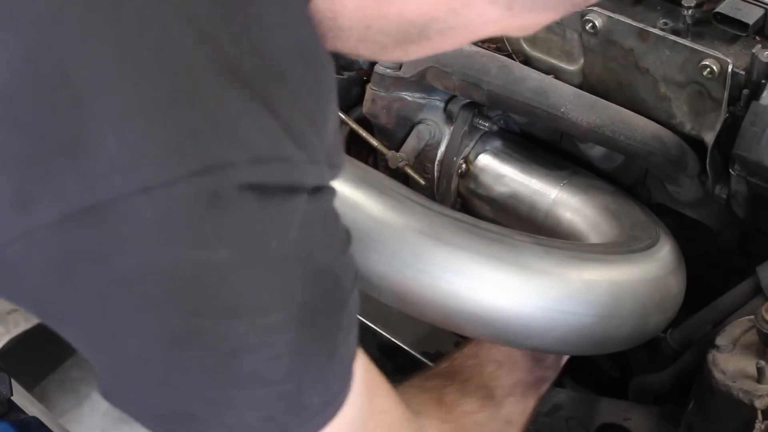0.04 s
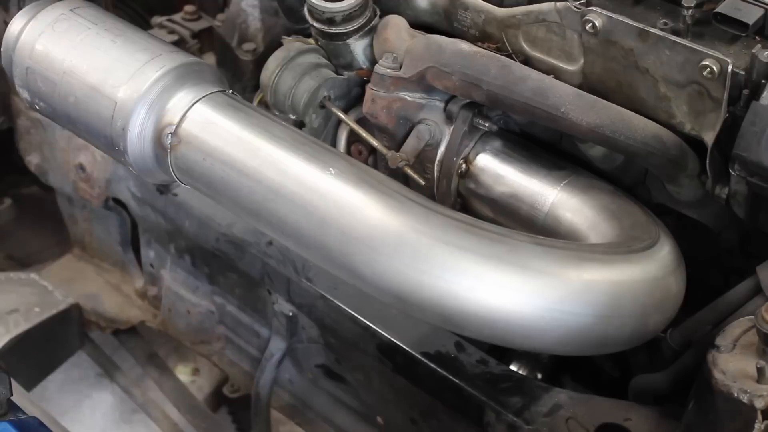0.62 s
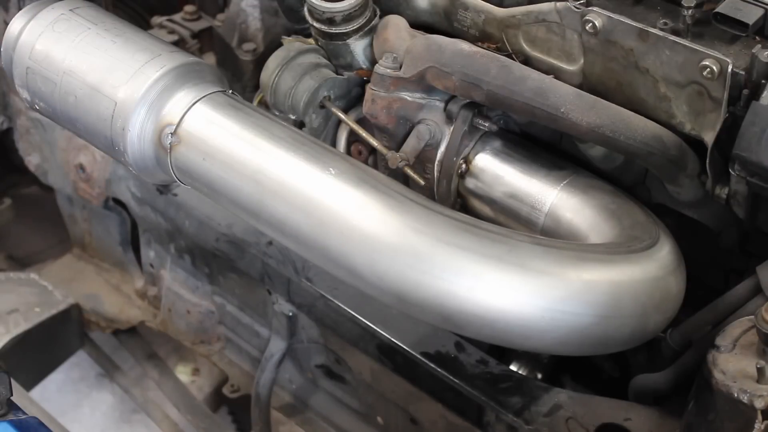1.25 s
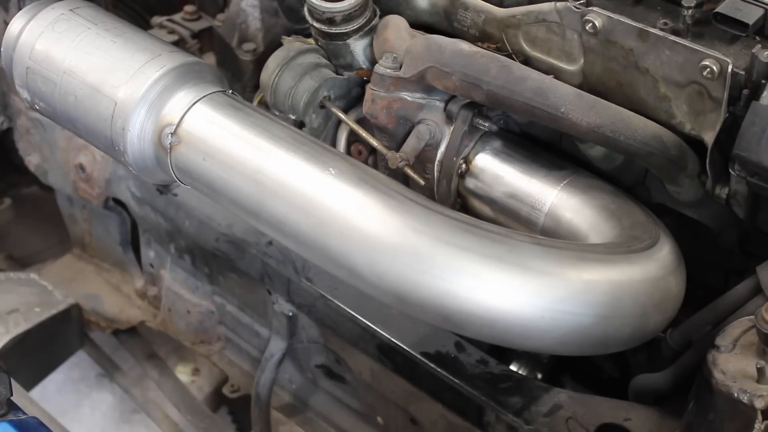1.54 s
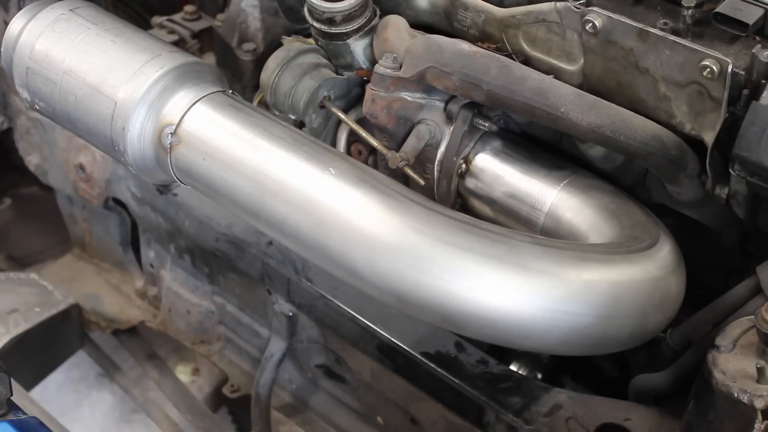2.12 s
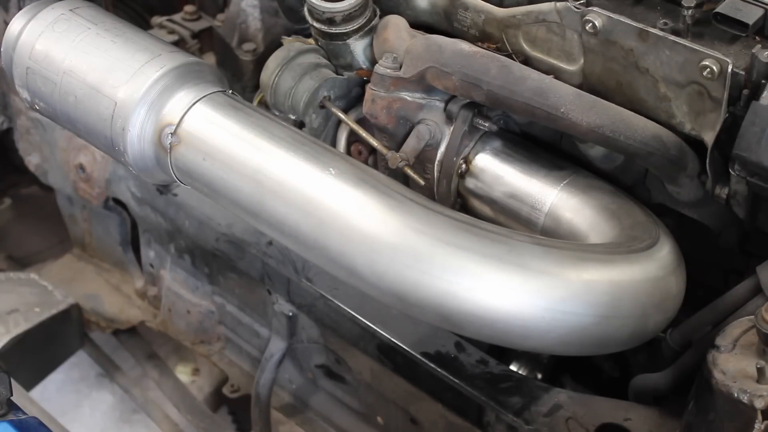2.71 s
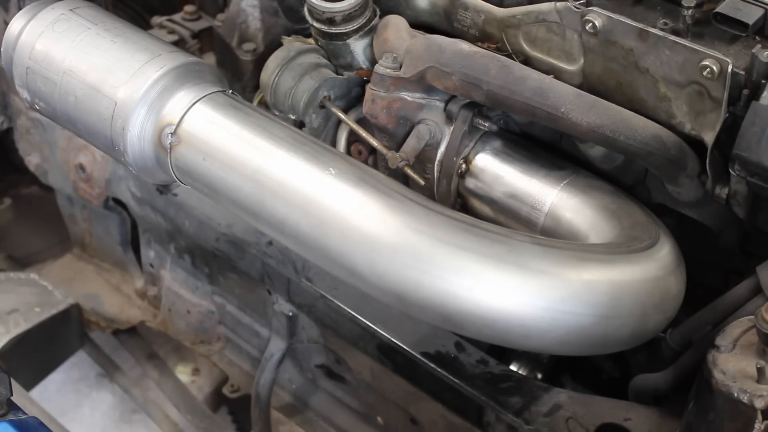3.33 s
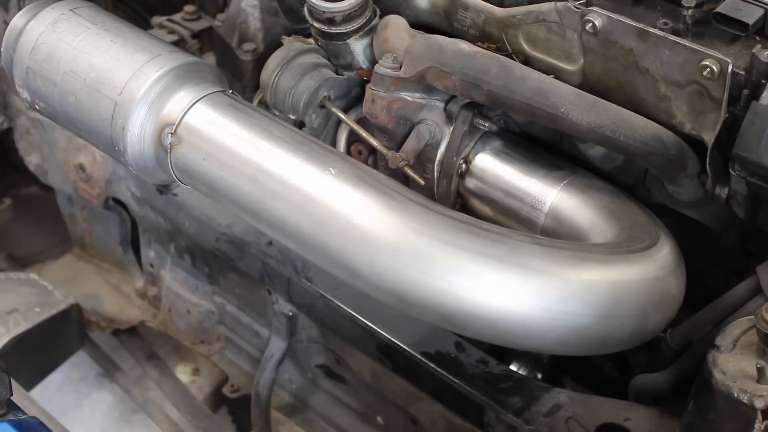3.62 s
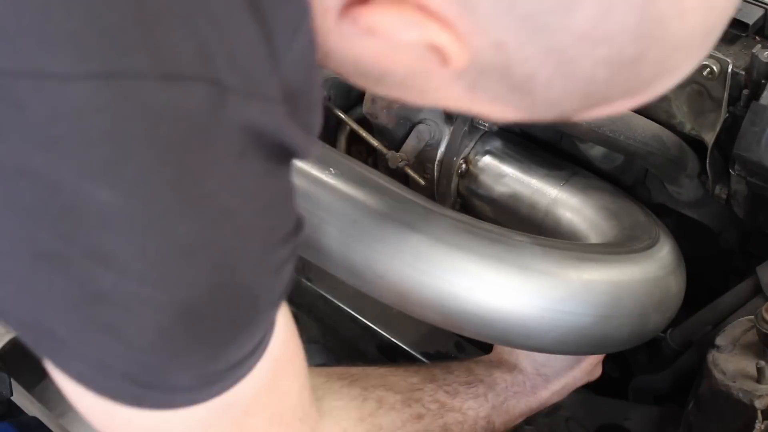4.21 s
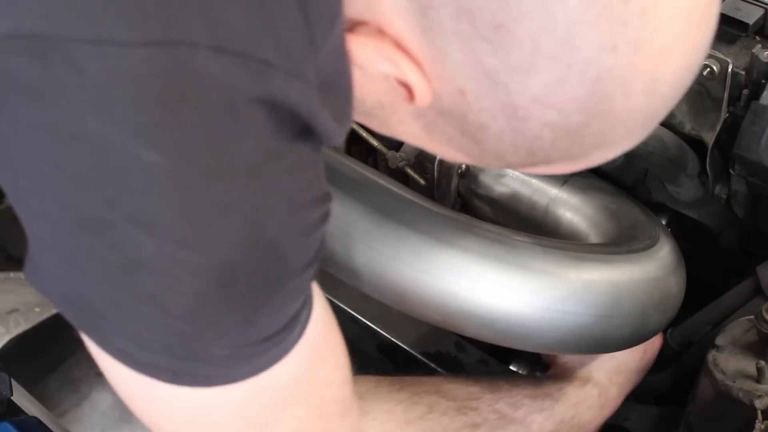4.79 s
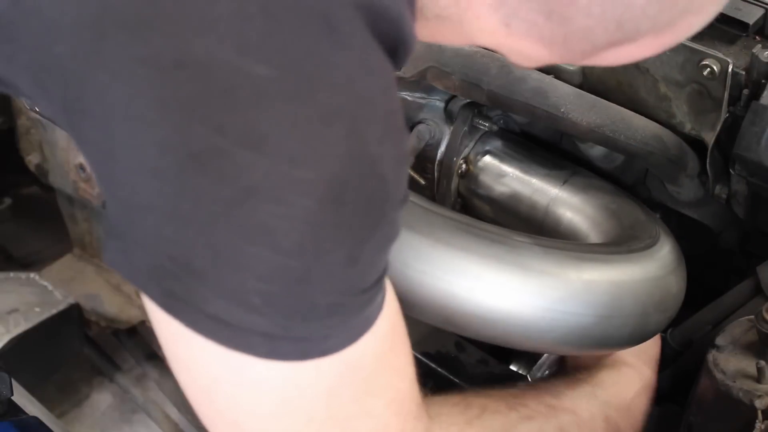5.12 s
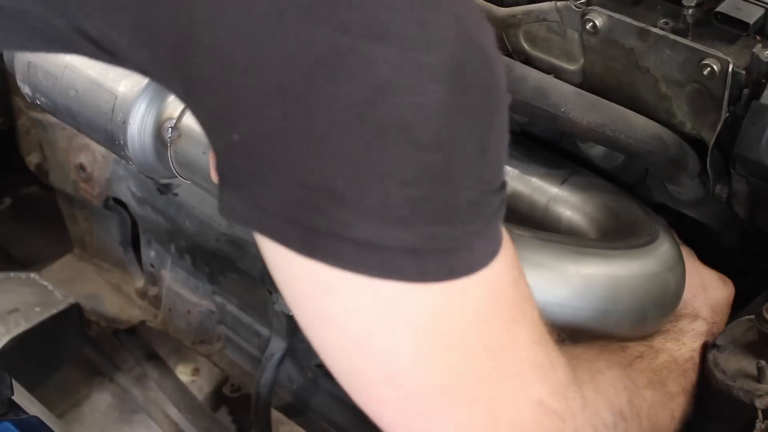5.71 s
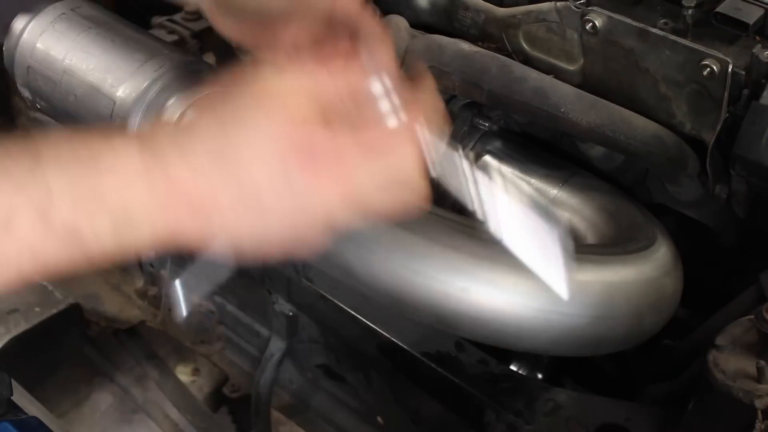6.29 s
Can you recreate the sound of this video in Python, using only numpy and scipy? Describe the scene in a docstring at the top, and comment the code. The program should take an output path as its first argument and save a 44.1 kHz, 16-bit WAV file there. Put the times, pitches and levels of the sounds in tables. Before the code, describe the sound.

Close metal tools clatter lightly in a quiet workshop, followed by louder tapping and scraping on steel tubing.

```python
"""A quiet, steady hush and light clinks of steel: a small workshop, heard from close by an engine bay.
Just right of the stereo microphone, a mechanic rummages through hand tools, which knock, slide and squeak.
From about 5 s a ratchet taps, rattles and finally scrapes along a stainless exhaust pipe.
Each contact is a run of tiny slips driving the resonances of tool or tubing; parts struck hard enough
ring on, and the bay and walls return a short, faint reverberation."""
import sys
import numpy as np
from scipy import signal
from scipy.fft import rfft, irfft, next_fast_len
from scipy.io import wavfile
from scipy.ndimage import uniform_filter1d

SR = 44100
rng = np.random.default_rng(int(sys.argv[2]) if len(sys.argv) > 2 else 0)


def dump(signal):
    """Clip the signal to [-1, 1] and save it as 16-bit WAV at the path in sys.argv[1]."""
    limited = np.clip(np.atleast_2d(signal).T, -1, 1)
    pcm = np.round(limited * 32767).astype(np.int16)
    wavfile.write(sys.argv[1], SR, pcm)


N = 280035

# broad spectrum of a contact on the pipe: frequency_hz, gain_db
PIPE_SPECTRUM = [(50, -62), (100, -23.5), (150, -11.5), (270, -13), (600, -3), (950, -4), (1470, -1),
                 (2900, 4.5), (4200, -6), (5900, -6), (8150, -14.5), (10900, -22.5), (14000, -31.5),
                 (16000, -35)]
# resonances of the pipe, relative to the plain contact: pitch_hz, width_hz, gain_db
PIPE_RESONANCES = [(245.5, 27, 9.5), (350.4, 21, 8.5), (822, 19, 4.5), (1020, 74, 11), (1166, 54, 2.5),
                   (1400, 35, -15), (1793, 17, 4), (2340, 150, -11), (2850, 56, -6), (3054, 105, 0),
                   (2890, 58, -2.5), (4460, 320, 3.5), (5700, 31, -2), (6700, 58, 4)]
# at the microphone, bass sits further right than treble: frequency_hz, left_minus_right_db
STEREO_LEAN = [(200, -6), (1000, -0.5), (2800, 2), (8000, 5.5)]
PIPE_MIDS = dict(middle_db=-3, bass_share=1)


def amp(db):
    """Decibels to gain."""
    return 10 ** (np.asarray(db) / 20)


def unit(x):
    """Scales to rms 1."""
    return x / np.sqrt(np.mean(abs(x) ** 2) + 1e-30)


def read(points, hz):
    """Reads a table on a log-frequency axis."""
    f, value = np.transpose(points)
    return np.interp(np.log(hz + 1), np.log(f), value)


def add(mix, start_s, sound):
    """Mixes a stereo sound in from start_s."""
    at = round(start_s * SR)
    sound = sound[:, max(-at, 0):]
    part = mix[:, max(at, 0):][:, :sound.shape[1]]
    part += sound[:, :part.shape[1]]


def sides(lean_db):
    """Left and right gains of constant power; a negative lean is right of the microphone."""
    half_db = np.atleast_1d(lean_db) / 2
    pair = np.array([amp(half_db), amp(-half_db)])
    return pair / np.sqrt(np.mean(pair ** 2, 0))


def stroke(rise_ms, fall_ms):
    """Time axis and force of one contact: it swells, rounds off at t = 0 and dies away."""
    t = np.arange(-2730, 5462) / SR
    slope_s = np.where(t < 0, rise_ms, fall_ms) / 1000
    return t, np.exp(1 - np.hypot(1, t / slope_s))


def causal(gain):
    """Minimum-phase response with this magnitude."""
    cepstrum = irfft(np.log(gain + 1e-9))
    half = cepstrum.shape[-1] // 2
    cepstrum[..., 1:half] *= 2
    cepstrum[..., half + 1:] = 0
    return np.exp(rfft(cepstrum))


def hush(level_db=-60, drift_db=0.9):
    """Workshop air all round the microphone, drifting a little in level."""
    # room tone: frequency_hz, gain_db
    spectrum = [(25, -27), (50, -9.5), (85, -0.5), (140, -5.5), (250, -5), (420, -8), (630, -9),
                (1000, -8.5), (2000, -14), (4500, -18), (8000, -25.5), (15700, -36.5)]
    # its stereo balance: frequency_hz, left_minus_right_db
    balance = [(60, -15), (200, -7), (400, -7.5), (1300, -5.5), (4400, -2), (10000, -0.5)]
    size = next_fast_len(N, True)
    hz = np.fft.rfftfreq(size, 1 / SR)
    noise = rfft(rng.standard_normal((2, size)))
    air = irfft(noise * amp(read(spectrum, hz)) * sides(read(balance, hz)), size)[:, :N]
    drift = np.interp(np.arange(N), np.linspace(0, N, 60), rng.standard_normal(60))
    return amp(level_db + drift_db * drift) * unit(air)


def clinks(part, modes, rise_s, flutter, lean_db):
    """A struck steel part chatters as it rings on in its own modes."""
    # blows hard enough to ring or thump: peak_s, level_db, part
    blows = [(.01, -50.5, "ratchet"), (0.038, -51, "pawl"), (0.117, -41, "bracket"), (.812, -43, "tray"),
             (.974, -50.5, "tray"), (1.069, -49.5, "tray"), (1.899, -40, "tray"), (2.06, -28.5, "tray"),
             (2.56, -40.5, "tray"), (1.997, -29.5, "socket"), (2.063, -31, "socket"),
             (2.066, -42, "spanner"), (2.125, -33, "spanner"), (2.158, -33, "spanner"),
             (2.237, -43, "spanner"), (2.362, -42.5, "spanner"), (2.926, -43, "socket"),
             (3.131, -53, "spanner"), (3.93, -28, "panel"), (4.197, -41, "bracket"), (4.571, -56, "pawl"),
             (5.074, -24, "tube"), (5.843, -16, "tube"), (5.922, -13.5, "tube"), (6.02, -26.5, "tube"),
             (6.048, -20, "tube"), (6.316, -28, "ratchet"), (6.324, -33.5, "pawl")]
    out = np.zeros((2, N))
    t = np.arange(-SR // 20, SR // 2) / SR
    hz, mode_db, t60 = np.transpose(modes)[:, :, None]
    decay = amp(mode_db - 60 * np.maximum(t, 0) / t60) / np.linalg.norm(amp(mode_db))
    swell = np.exp(1 - np.hypot(1, np.minimum(t, 0) / rise_s))
    knots = t[::300]  # each mode's level flickers about every 7 ms
    for peak_s, level_db, _ in (row for row in blows if row[2] == part):
        phase = rng.uniform(0, 2 * np.pi, (2, len(hz), 1))
        flicker = 1 + flutter * rng.standard_normal((len(hz), len(knots)))
        chatter = np.array([np.interp(t, knots, gains) for gains in flicker])
        ring = (decay * chatter * np.sin(2 * np.pi * hz * t + phase)).sum(1)
        add(out, peak_s + t[0], amp(level_db) * np.sqrt(2) * swell * ring * sides(lean_db))
    return out


def ringing_steel():
    """Steel parts ring freely, from the bright socket to the dull tool tray, each in its own place."""
    # modes of each part: pitch_hz, level_db, t60_s
    socket = [(2557, -10, .13), (3386, 0, .085), (5168, -6, .2), (6266, -3, .1), (7424, -2, .07),
              (7698, -4, .07), (8689, -7, .1), (9539, -14, .065), (10080, -13, .1), (10650, -12, .11),
              (11700, -14, .08), (14340, -15, .05)]
    spanner = [(2180, -3, .07), (2240, 0, .08), (5200, 0, .11), (5255, -8, .1), (7720, -8, .1),
               (7800, -9, .08), (10130, -18, .08), (10650, -12, .08), (11640, -18, .07), (14000, -21, .1)]
    ratchet = [(1303, -11, .2), (2690, -9, .12), (3106, 0, .2), (3190, -7, .1), (4199, -8, .18),
               (7079, -16, .09), (8312, -22, .15)]
    pawl = [(4710, 0.5, 0.1), (4970, -32, 0.29), (5400, 19, 0.097), (13670, 10, 0.07)]
    tube = [(826, -19.5, 0.092), (982, -3.5, 0.093), (2300, -26, 0.071), (2650, -2, 0.043), (2860, -6, 0.1),
            (2940, -7, 0.062), (3070, -5, 0.049), (3200, 0.5, 0.051)]
    panel = [(432, 2.5, 0.065), (500, -16, 0.04), (900, -3, 0.052), (1240, -3, .04), (1700, -4, .045),
             (1980, -4, .045)]
    tray = [(177, -4.5, .09), (260, 5.5, 0.088), (298, -1.5, 0.082), (359, 0, 0.055)]
    bracket = [(931, -11, .36), (1280, 0, .1), (1373, -14, .23), (1750, -5, .08), (2950, -13, .08),
               (4840, -20, .08)]
    return (clinks("socket", socket, rise_s=0.004, flutter=0.35, lean_db=-4)
            + clinks("spanner", spanner, rise_s=0.0087, flutter=0.46, lean_db=-8)
            + clinks("ratchet", ratchet, rise_s=0.0034, flutter=0.15, lean_db=-11)
            + clinks("pawl", pawl, rise_s=0.0041, flutter=0.95, lean_db=-8)
            + clinks("tube", tube, rise_s=0.00076, flutter=0.89, lean_db=-5)
            + clinks("panel", panel, rise_s=0.0012, flutter=0.42, lean_db=-9)
            + clinks("tray", tray, rise_s=0.002, flutter=0.28, lean_db=-16.5)
            + clinks("bracket", bracket, rise_s=0.0031, flutter=0.52, lean_db=-15))


def friction(size, grain_db):
    """Rubbing surfaces catch and let go about once a millisecond, in tiny slips and impacts."""
    left, right_only = rng.standard_normal((2, size))
    # part of the sound reaches both sides of the microphone, by paths of unequal length
    right = 0.6 * np.roll(left, rng.integers(-130, 131)) + 0.8 * right_only
    catches = unit(uniform_filter1d(rng.standard_normal(size), size=40))
    return amp(grain_db * catches) * np.array([left, right])


def resonances(body, hz):
    """Response of a body: the plain contact plus its resonances."""
    return 1 + sum(amp(db) / (1 + 2j * (hz - pitch) / width) for pitch, width, db in body)


def tilt_db(hz, bass_db, treble_db, middle_db, bass_share):
    """Weight lifts the bass and, by bass_share, the mids; a hard edge lifts the treble."""
    mids_db = middle_db + bass_share * bass_db
    return read([(250, bass_db), (950, mids_db), (2800, 0), (8000, treble_db)], hz)


def contacts(rows, spectrum, body, mids, lean_db, firm_rise_ms, grain_db, spot_db):
    """Each contact is a dense run of tiny slips and impacts that drives the resonances of the body."""
    firm_db, sharpen = -30, 0.15  # harder blows rise faster, softer ones slower
    spot_hz = np.geomspace(200, 16000, 70)
    out = np.zeros((2, N))
    for peak_s, level_db, fall_ms, bass_db, treble_db in rows:
        rise_ms = min(firm_rise_ms * amp(-sharpen * (level_db - firm_db)), 0.64 * fall_ms)
        t, force = stroke(rise_ms, fall_ms)
        hz = np.fft.rfftfreq(len(t), 1 / SR)
        grains = friction(len(t), grain_db)
        # treble needs the hardest part of the contact, so it comes later and dies sooner
        soft = rfft(unit(force * grains))
        hard = rfft(unit(force ** 1.5 * grains))
        treble_share = hz ** 2 / (hz ** 2 + 6000 ** 2)
        slips = (soft + treble_share * (hard - soft)) * np.sqrt(np.mean(force ** 2))
        # every spot touched has its own broad colour and a few short, bright overtones
        colour_db = spot_db * read(np.c_[spot_hz, rng.standard_normal(len(spot_hz))], hz)
        overtones = [(pitch_hz, 90, 5) for pitch_hz in rng.uniform(4000, 15000, 8)]
        shape = causal(amp(read(spectrum, hz) + tilt_db(hz, bass_db, treble_db, **mids) + colour_db))
        placement = sides(lean_db + read(STEREO_LEAN, hz))
        response = resonances(list(body) + overtones, hz) * shape * placement
        add(out, peak_s + t[0], amp(level_db) * irfft(slips * unit(response)))
    return out


def hand_tools(slide_fall_ms=12.3, slide_treble_db=-0.5):
    """Close on the right, tools knock with a quick attack and slide over each other with a slower one."""
    # tools knocking, then the ratchet finding its nut: peak_s, level_db, fall_ms, bass_db, treble_db
    knocks = [(.037, -45, 8.7, 3, 8), (.12, -51.5, 13, -10, -4), (.671, -45.5, 14, 16, 9),
              (.695, -51.5, 13, 1, 4), (.812, -45, 7.2, 27, -8), (1.252, -46, 13.3, -6, -1.5),
              (1.412, -44, 24, 0, -5.5), (1.471, -40.5, 17, 3.5, -7.5), (1.531, -40.5, 9.3, 10, -10),
              (1.591, -36.5, 11, 2.5, -7.5), (1.666, -42, 13, -4, -6), (1.697, -29, 16, 5.5, -3),
              (1.729, -37.5, 10.5, 13, 5), (1.791, -44, 5.7, 15, -20), (1.879, -33, 12.5, 12, 2),
              (1.9, -29.5, 15, 9.5, -2.5), (1.997, -31.5, 11.6, 2, 17.5), (2.06, -22, 14.8, 8, 5),
              (2.127, -38.5, 18.5, 12, 9), (2.218, -44, 16, 6, 8), (2.236, -35.5, 12.5, 3.5, 6),
              (2.36, -29.5, 12.4, -1.5, 3.5), (2.872, -44, 17, 4, -12), (2.923, -30, 11, 11.5, 5.5),
              (3.046, -31.5, 14.2, 5.5, -2), (3.422, -33, 8.2, -28, 9.5), (3.501, -50, 11, -11, 7.5),
              (3.634, -41.5, 10.7, -26, 5.5), (3.679, -36.5, 6.6, -29, 10), (3.733, -42, 10, -10, 10),
              (3.931, -32, 9.4, 2, 0), (4.117, -34, 11.8, -4.5, 6.5), (4.196, -37.5, 6.7, -2, 3),
              (4.424, -35, 6.6, -31, -16), (4.569, -27.5, 5.9, -22.5, -6), (4.65, -33, 12.3, -19, 0.5),
              (4.708, -29.5, 8.4, -23.5, -9.5), (4.865, -40.5, 5.2, -16, -11),
              (4.885, -33, 13.3, -16.5, -3.5), (4.949, -39, 8.6, -8, -25)]
    # tools dragged over each other: peak_s, level_db, bass_db
    drags = [(0.761, -57, 4), (0.906, -53.5, 6), (1.814, -40, 22), (1.942, -38, 18.5), (2.037, -34.5, -8),
             (2.156, -39, -9), (2.274, -44, 4), (2.568, -45.5, 14.5), (2.909, -46, 9), (3.134, -40.5, -1),
             (3.58, -53.5, -7), (3.799, -50.5, 5.5), (3.906, -46.5, 12), (4.239, -54.5, 10)]
    # broad spectrum of a contact between tools: frequency_hz, gain_db
    spectrum = [(50, -24), (100, -36), (155, -8.5), (270, -4.5), (420, -2), (650, -3.5), (950, -5),
                (2000, -2), (4200, -6), (5900, -12), (8150, -19), (10900, -27.5), (14000, -37),
                (16000, -41)]
    # resonances of the tools, relative to the plain contact: pitch_hz, width_hz, gain_db
    body = [(274, 36, -5.5), (364, 62, -8.5), (504, 57, -8.5), (1725, 8.3, -38), (2404, 19, 0),
            (3140, 88, -19), (3980, 18, -18), (5120, 69, 2.5)]
    slides = [(peak_s, db, slide_fall_ms, bass_db, slide_treble_db) for peak_s, db, bass_db in drags]
    steel = dict(spectrum=spectrum, body=body, mids=dict(middle_db=2.4, bass_share=0.44), lean_db=-7.5)
    return (contacts(knocks, **steel, firm_rise_ms=4.17, grain_db=2, spot_db=3)
            + contacts(slides, **steel, firm_rise_ms=20, grain_db=-1.5, spot_db=3.5))


def squeaks(lean_db=-9.5):
    """Friction caught in one resonance: a fuzzy pitch under a short swell."""
    # steel sticking briefly: peak_s, level_db, pitch_hz, width_hz
    sticks = [(.356, -54, 2300, 1400), (0.439, -39.5, 2160, 610), (2.56, -51, 2500, 600),
              (2.588, -42.5, 1060, 348), (2.694, -59.5, 2590, 900), (3.244, -48.5, 7340, 1800),
              (3.253, -43.5, 4220, 550), (3.296, -47, 3860, 2250), (3.298, -52, 7960, 1700),
              (4.017, -43.5, 2720, 350), (4.023, -41.5, 1770, 550), (4.124, -45, 2300, 200),
              (4.149, -41.5, 2180, 500), (6.242, -39, 1440, 397)]
    out = np.zeros((2, N))
    t, force = stroke(rise_ms=6, fall_ms=11)
    hz = np.fft.rfftfreq(len(t), 1 / SR)
    for peak_s, level_db, pitch_hz, width_hz in sticks:
        resonance = 1 / (1 + (2 * (hz - pitch_hz) / width_hz) ** 2)
        fuzzy_tone = irfft(rfft(friction(len(t), grain_db=1.5)) * resonance)
        squeak = unit(force * fuzzy_tone) * np.sqrt(np.mean(force ** 2))
        placement = sides(lean_db + read(STEREO_LEAN, pitch_hz))
        add(out, peak_s + t[0], amp(level_db) * squeak * placement)
    return out


def pipe_scrape(lean_db):
    """The ratchet drags along the tubing and drives its resonances without a break."""
    # how hard the ratchet rubs: time_s, level_db
    rub = [(4.82, -97), (4.88, -57), (5.01, -59.5), (5.12, -45), (5.3, -54), (5.44, -33), (5.52, -56.5),
           (5.74, -67), (5.78, -39), (5.83, -47), (5.87, -25.5), (5.955, -38), (5.992, -22.5),
           (6.017, -37.5), (6.116, -24), (6.145, -33), (6.24, -36.5), (6.29, -64)]
    size = 2 * next_fast_len(N // 2 + SR // 4, True)
    hz = np.fft.rfftfreq(size, 1 / SR)
    pressure = amp(np.interp(np.arange(size) / SR, *np.transpose(rub), left=-np.inf, right=-np.inf))
    slips = pressure * unit(friction(size, grain_db=2))
    shape = causal(amp(read(PIPE_SPECTRUM, hz) + tilt_db(hz, bass_db=5.5, treble_db=3.5, **PIPE_MIDS)))
    response = resonances(PIPE_RESONANCES, hz) * shape * sides(lean_db + read(STEREO_LEAN, hz))
    return irfft(rfft(slips) * unit(response))[:, :N]


def pipe_strikes(lean_db):
    """The ratchet taps and rattles against the tubing, close to the microphone."""
    # blows on the pipe: peak_s, level_db, fall_ms, bass_db, treble_db
    strikes = [(5.0435, -30.5, 10, -8, 7), (5.074, -24, 15.4, 3, -9.5), (5.156, -34.5, 9.6, 0, 6.5),
               (5.195, -22.5, 13, 10, -1), (5.248, -34, 11.4, 3, 11), (5.279, -24.5, 17.5, 2, -2.5),
               (5.342, -22.5, 18.7, 3, 0), (5.386, -30, 7.1, -2, 8), (5.46, -26.5, 11.4, 9.5, 0),
               (5.585, -28, 15, -8, 2), (5.594, -22.5, 9.6, 6, -6), (5.682, -31.5, 6.8, 5, 9),
               (5.759, -24, 15, 5.5, -1), (5.801, -22.5, 7.3, 1.5, 3.5), (5.843, -18, 6.4, 0.5, 4),
               (5.921, -19.5, 9.4, 1, 7), (5.964, -20.5, 2, 0, -2), (6.021, -21.5, 3.9, 10, 9.5),
               (6.047, -21.5, 5.1, 6, 6.5), (6.166, -23, 9.1, 4, -3), (6.196, -25.5, 4.2, -12, -5.5),
               (6.218, -26.5, 6.5, 12.5, 2), (6.314, -30, 6.7, -12, -5), (6.322, -26, 13, -5.5, -5.5)]
    return contacts(strikes, PIPE_SPECTRUM, PIPE_RESONANCES, PIPE_MIDS, lean_db,
                    firm_rise_ms=3.55, grain_db=2, spot_db=2.5)


def workshop_reflections(near):
    """Dense reflections from the bay and the walls, each band dying at its own speed."""
    # reverberation of the workshop: frequency_hz, t60_s
    decay_times = [(150, 0.26), (1000, 0.072), (4000, 0.21), (12000, 0.15)]
    arrived = np.arange(SR // 2) > SR // 200  # 5 ms behind the direct sound
    taps = rng.standard_normal((2, SR // 2)) * arrived
    hz, t, bands = signal.stft(taps, SR, nperseg=256)
    decay = amp(-60 * t / read(decay_times, hz)[:, None])
    _, tail = signal.istft(bands * decay, SR, nperseg=256)
    return signal.fftconvolve(near, tail / np.linalg.norm(tail[0]), axes=1)[:, :N]


def scene():
    """Close work to the right of the microphone, with the workshop faint behind it."""
    pipe_lean_db = -8.5
    near = hand_tools() + pipe_strikes(pipe_lean_db) + pipe_scrape(pipe_lean_db)
    near += ringing_steel() + squeaks()
    return near + amp(-17) * workshop_reflections(near) + hush()


def record(dry):
    """The recorder cuts the treble above 15.8 kHz."""
    lowpass = signal.firwin(511, 15800, window=("kaiser", 9), fs=SR)
    return signal.oaconvolve(dry, lowpass[None], "same")


dry = scene()
out = record(dry)
dump(out)
```